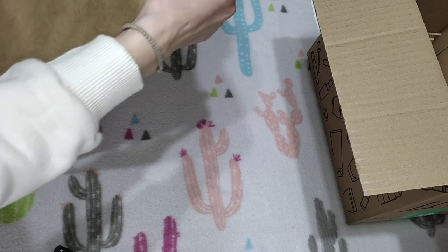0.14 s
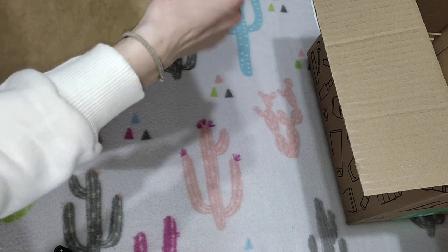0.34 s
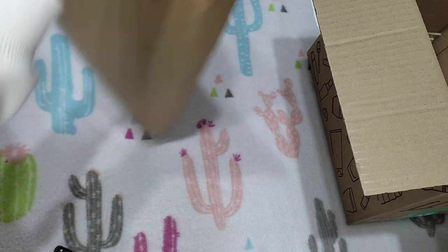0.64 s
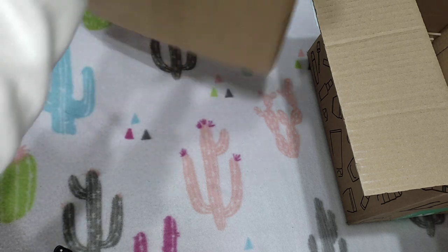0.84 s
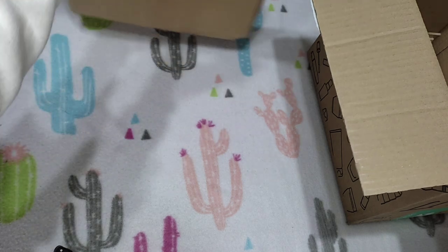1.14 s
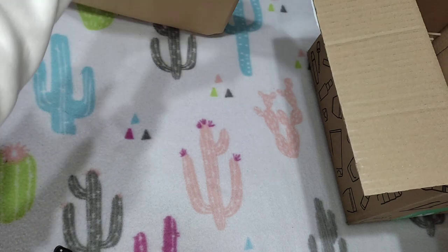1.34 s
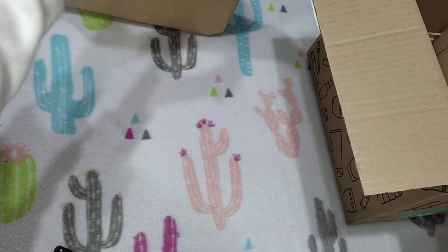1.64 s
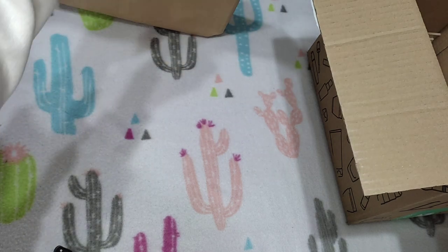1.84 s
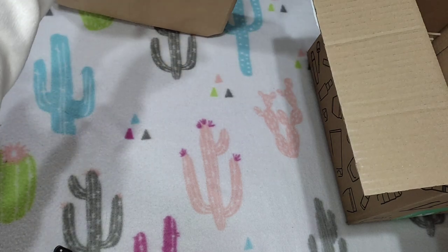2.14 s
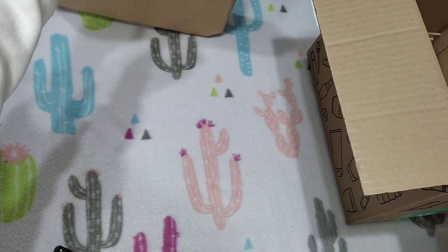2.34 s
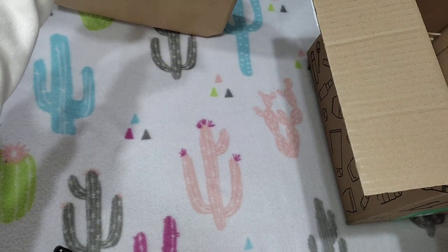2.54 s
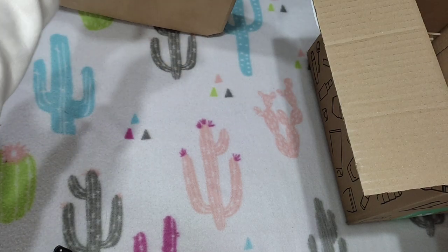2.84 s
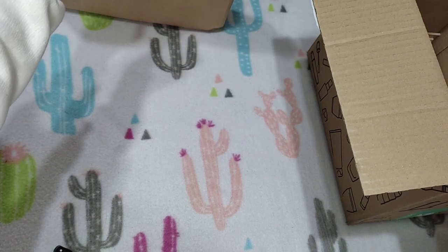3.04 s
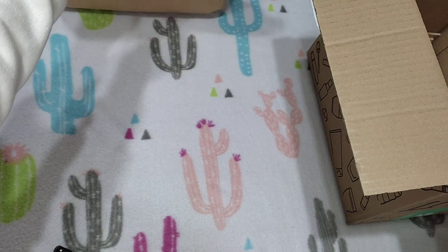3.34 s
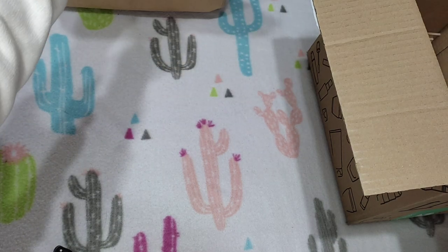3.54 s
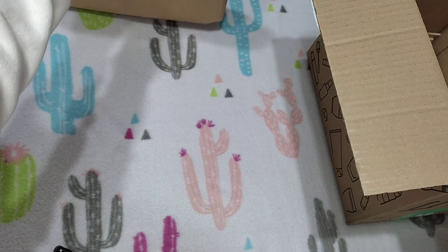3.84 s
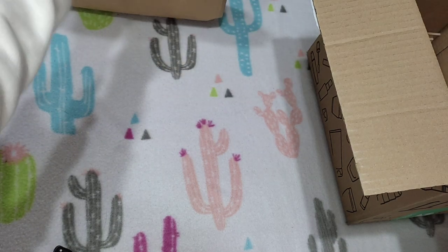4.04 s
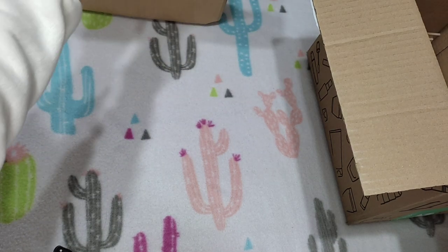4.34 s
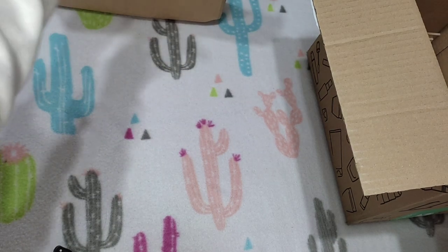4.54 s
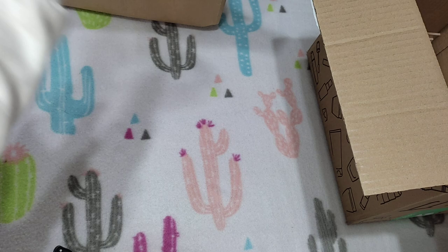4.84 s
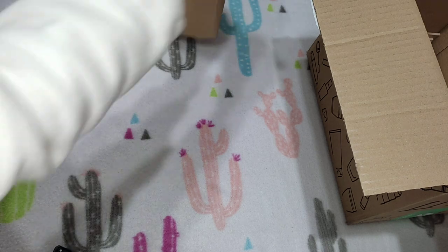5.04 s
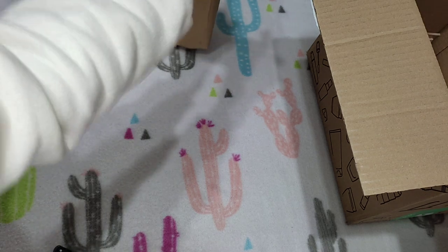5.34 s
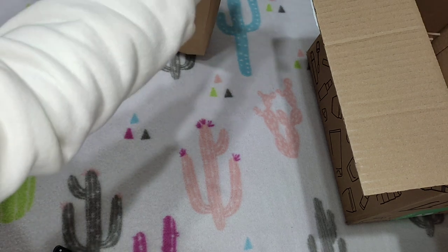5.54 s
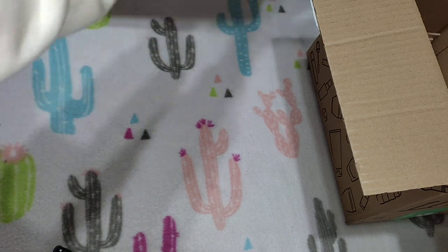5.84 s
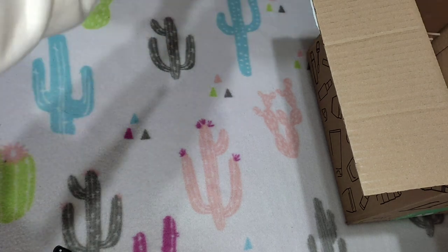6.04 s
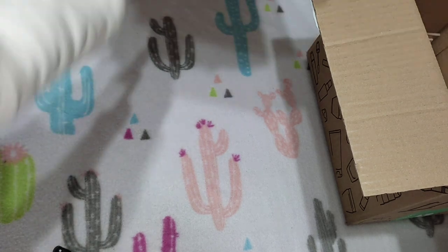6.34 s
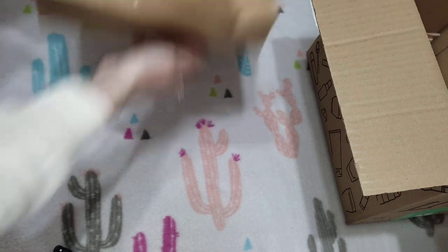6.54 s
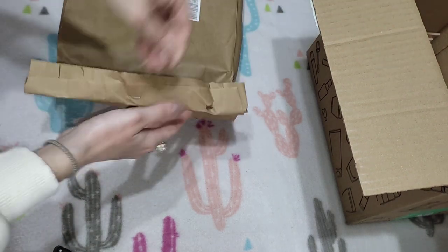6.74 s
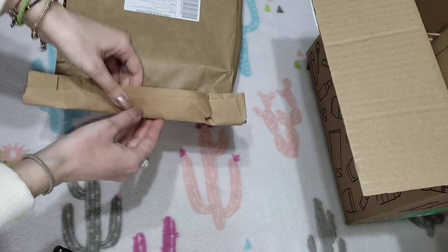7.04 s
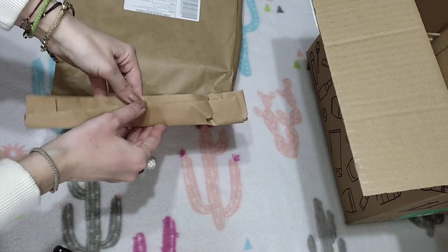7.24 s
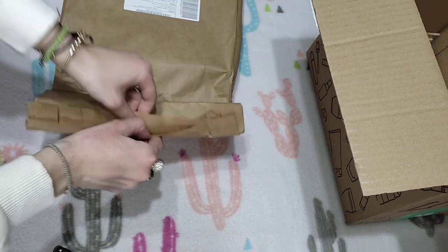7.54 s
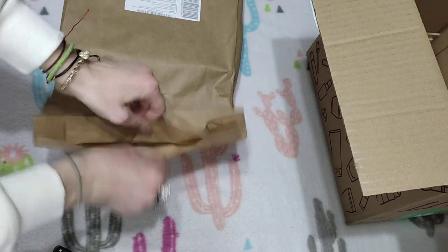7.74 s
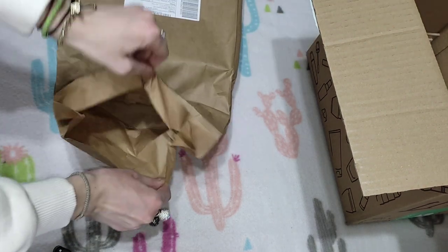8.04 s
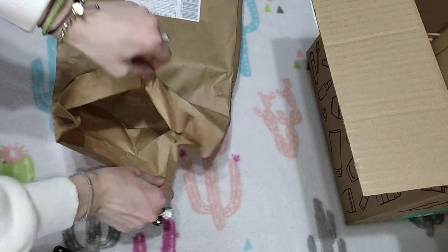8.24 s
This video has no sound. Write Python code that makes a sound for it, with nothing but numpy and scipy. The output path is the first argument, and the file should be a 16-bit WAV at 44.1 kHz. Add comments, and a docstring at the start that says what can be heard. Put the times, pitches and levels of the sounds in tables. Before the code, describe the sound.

A stiff paper envelope is handled close to the microphone in a small room, starting with a strong, crisp rustle in the first quarter second. Short, irregular strokes of crumpling and tearing follow, full of fine crackle and the sharp snaps of buckling creases. The crinkling thickens from about 1.5 to 2.1 seconds and carries on in uneven clumps, with an occasional soft thud from the whole envelope. A loud snap and rip come at about 4.2 seconds, and brighter tearing between 5.2 and 5.5 seconds. More rustling and a few dull bumps continue until about 6.8 seconds, when the paper drops to light ticks. From about 7.7 seconds to the end at just over 8 seconds, it crackles strongly again, sounding slightly hollow as the envelope opens. The room adds a short reverberation, and a faint steady hiss lies underneath.

```python
"""In a small room, a stiff kraft-paper envelope is handled, torn and crumpled near a two-port microphone.
Stick-slip friction makes the paper rustle, the sheet flap and the fibres crackle in clumps.
Creases snap by buckling and excite the resonances of the enclosed air; now and then the whole envelope
thuds. The room adds a short reverberation, and a steady hush with microphone hiss lies beneath.
The left port hears the paper first and rings in the top octave."""
import sys
import numpy as np
from scipy import signal
from scipy.fft import rfft, irfft, next_fast_len
from scipy.io import wavfile
from scipy.ndimage import uniform_filter1d, map_coordinates

SR = 44100
rng = np.random.default_rng(int(sys.argv[2]) if len(sys.argv) > 2 else 0)


def generate_wav(sig):
    """Save sig (samples, or channels by samples) to the path in sys.argv[1] as 16-bit PCM at SR."""
    pcm = np.round(np.clip(np.atleast_2d(sig).T, -1, 1) * 32767).astype(np.int16)
    wavfile.write(sys.argv[1], SR, pcm)


N = 370440


def amp(db):
    return 10 ** (np.asarray(db) / 20)


def unit_rms(x):
    return x / np.sqrt(np.mean(x ** 2) + 1e-20)


def along(points, hz):
    """Interpolation of (Hz, value) points on a logarithmic frequency axis."""
    freqs, values = np.transpose(points)
    return np.interp(np.log(hz + 1), np.log(freqs + 1), values)


def wobble(rate):
    """Spline interpolation through random knots, rate of them a second."""
    return map_coordinates(rng.standard_normal(int(N * rate / SR) + 4), [np.arange(N) * rate / SR])


def filtered(x, response):
    """Linear filtering: the spectrum of x is multiplied by a complex frequency response."""
    size = next_fast_len(N + SR // 2)
    return irfft(rfft(x, size) * response(np.fft.rfftfreq(size, 1 / SR)), size)[..., :N]


def minimum_phase(spectrum):
    """Folding the cepstrum gives a causal response of unit power with this spectral shape."""
    def response(hz):
        cepstrum = irfft(np.log(np.maximum(amp(along(spectrum, hz)), 1e-6)))
        half = len(cepstrum) // 2
        cepstrum[1:half] *= 2
        cepstrum[half + 1:] = 0
        gain = np.exp(rfft(cepstrum))
        return gain / np.sqrt(np.mean(np.abs(gain) ** 2))
    return response


def fading(power, t60):
    """Exponential decay spreads each impulse of power in time and conserves its energy."""
    keep = amp(-120 / (t60 * SR))
    return signal.lfilter([1 - keep], [1, -keep], power)


# Steady background hush, with the microphone's hiss peak near 12 kHz.
# Each row: frequency in Hz, relative spectral density in dB.
HUSH_SPECTRUM = [(25, -44), (60, -13.5), (250, -10.5), (3000, -19), (11000, -28.5), (11900, -17),
                 (15300, -32), (16500, -66)]

def background_hush():
    """Stationary Gaussian noise gives a steady hush, coloured at the top by the microphone."""
    return amp(-50.5) * filtered(rng.standard_normal((2, N)), minimum_phase(HUSH_SPECTRUM))


# Strokes of the hands on the paper. Each row: start in seconds, length in seconds, rustle level in dB,
# swell over the stroke in dB, fibre level relative to the rustle in dB.
HAND_STROKES = [(0, 0.11, -48.5, 17, -8), (0.152, 0.081, -22.5, -1, -6.5), (0.357, 0.015, -29.5, -4, -5.5),
                (0.442, 0.053, -31.5, 5.5, -10), (0.573, 0.21, -36.5, -0.5, -6.5),
                (0.952, 0.045, -44, 10, -8), (1.063, 0.073, -32, 3, 2), (1.182, 0.08, -37.5, 2, -9),
                (1.334, 0.043, -34.5, -5, -5), (1.547, 0.21, -28, -1.5, -7), (1.84, 0.18, -37, 8.5, -6),
                (2.152, 0.062, -30.5, -18, -7.5), (2.285, 0.24, -44, 3.5, -14),
                (2.575, 0.21, -32.5, -6, -3.5), (2.903, 0.093, -37, 10, -14), (3.043, 0.026, -31.5, 1, -6),
                (3.146, 0.065, -29.5, -6.5, -9.5), (3.361, 0.063, -31.5, -0.5, -3.5),
                (3.54, 0.034, -36, -5, -23), (3.605, 0.08, -39, 11.5, -5.5), (3.874, 0.16, -37.5, -13, -11),
                (4.178, 0.14, -25, 1.5, -5), (4.4, 0.038, -32, -18, -27), (4.488, 0.041, -34, 7, -3.5),
                (4.67, 0.15, -36, -1, -6), (4.89, 0.15, -32, -6.5, -6), (5.185, 0.045, -24, 4, -8),
                (5.351, 0.12, -25.5, 2, 1.5), (5.52, 0.16, -33.5, -3.5, -5.5),
                (5.765, 0.34, -31, 0.5, -5.5), (6.218, 0.12, -33, -9.5, -4), (6.402, 0.032, -24.5, 3, -5),
                (6.536, 0.17, -31.5, 9.5, -4), (6.739, 0.041, -25.5, 6.5, -3.5), (6.88, 0.12, -50, 2, -21),
                (7.209, 0.058, -38, 1, -7.5), (7.497, 0.15, -44, 9, 0), (7.747, .11, -38, 15.5, -8.5),
                (7.864, 0.089, -32.5, 10.5, -4.5), (8.131, 0.092, -22.5, -8, -3)]
# Freedom of the sheet in the grip. Each row: time in seconds, flap level in dB at a rustle of -28 dB.
GRIP_FREEDOM = [(0, -32.5), (.8, -37.5), (1.2, -39.5), (2.0, -35.5), (2.3, -40), (4.0, -39), (5.0, -34.5),
                (5.4, -40), (6.0, -37.5), (7.0, -37), (7.5, -49), (8.4, -38.5)]

def strokes():
    """Frictional drive of panels, flap and fibres in dB; overlapping strokes add in power."""
    rise_db_per_s, fall_db_per_s = 309, 272
    t, sample_t = np.arange(0, N + 64, 64) / SR, np.arange(N) / SR
    start, length, db, swell_db, fibre_db = np.transpose(HAND_STROKES)[..., None]
    held = db + swell_db * np.clip((t - start) / length, 0, 1)
    away = rise_db_per_s * np.maximum(start - t, 0) + fall_db_per_s * np.maximum(t - start - length, 0)

    def power_sum(each_db):
        return np.interp(sample_t, t, 10 * np.log10(np.sum(amp(each_db) ** 2, 0)))
    panel_db = power_sum(held - away)
    grip_db = np.interp(sample_t, *np.transpose(GRIP_FREEDOM))
    flap_db = grip_db + 0.74 * (panel_db + 28)  # the flap varies less than the rustle
    return panel_db, flap_db, power_sum(held + fibre_db - away)


def crackle(rate, spread_db, t60, clump_db):
    """Shot noise: tiny breaks of power-law size cluster into a power envelope of mean near 1."""
    when, size = rng.random((int(rate * N / SR), 2)).T
    breaks = np.bincount((when * N).astype(int), amp(-2 * spread_db * np.log(1.003 - size)), N)
    power = fading(fading(breaks, t60), t60 / 4) * amp(2 * clump_db * wobble(40))
    return power / (np.abs(uniform_filter1d(power, SR // 14)) + .01 * power.mean())


def ticks(rate, spread_db):
    """Isolated fractures radiate impulses of random sign and power-law size."""
    when, size, sign = rng.random((int(rate * N / SR), 3)).T
    heights = np.sign(sign - .5) * amp(-spread_db * np.log(1.003 - size))
    return np.bincount((when * N).astype(int), heights, N)


def shifting_noise(depth_db):
    """Spectral modulation: two noises change colour in patches, as panels between creases change size."""
    spectra = signal.stft(rng.standard_normal((2, N)), nperseg=1024)[2]
    patches = uniform_filter1d(rng.standard_normal(spectra.shape[1:]), 5, axis=0)
    patches = unit_rms(uniform_filter1d(patches, 2, axis=1))
    return unit_rms(signal.istft(spectra * amp(depth_db * patches), nperseg=1024)[1][:, :N])


# The flat panels between creases, then the whole flapping sheet.
# Each row: frequency in Hz, relative spectral density in dB.
PANEL_SPECTRUM = [(200, -26), (500, -9), (860, -9.5), (1380, -6.5), (3700, -9.5), (5000, -16.5),
                  (7500, -72)]
FLAP_SPECTRUM = [(25, -54), (60, -20), (140, -1), (310, 2), (500, -2), (900, -46)]
# Bright fibre crackle, with the same columns; the last points only limit the band near 15.5 kHz.
FIBRE_SPECTRUM = [(2500, -12.5), (4500, 2), (6550, 1), (11100, -8), (11900, 2.5), (15300, -14.5),
                  (15900, -50), (16300, -67)]
# Reverberation times of the room in seconds, for the panel, flap and fibre bands in turn.
REVERB_T60 = np.array([.22, .28, .16])

def paper():
    """Source and filter: friction and snaps drive three noise bands and the cavity (mid and side)."""
    panel_db, flap_db, fibre_db = strokes()
    levels = amp([panel_db, flap_db, fibre_db])
    common = crackle(rate=150, spread_db=4, t60=0.051, clump_db=9.5)
    grains = [crackle(rate=300, spread_db=5, t60=0.015, clump_db=3),
              crackle(rate=27, spread_db=6, t60=0.0075, clump_db=9.5),
              crackle(rate=250, spread_db=5.2, t60=0.01, clump_db=3)]
    # Harder, brighter strokes slide and rip densely; light ones only crackle.
    slide = 0.23 * amp(1.6 * (panel_db + 23.5) + 1.36 * (fibre_db - panel_db + 3.5))
    rasp = crackle(rate=2300, spread_db=2, t60=0.0036, clump_db=-3)  # paper dragged over paper
    crunches, out, knocks, cracks = snaps()

    opens_s, open_db, tick_db = 6.1, 7.5, 10
    mouth = amp(open_db) * (np.arange(N) > opens_s * SR)  # once open, the cavity rings with the rustle
    inside = mouth * levels[0] * np.sqrt(np.abs(grains[0])) * rng.standard_normal(N)
    out[0] += filtered(knocks + inside, cavity)

    tick_gain = amp(tick_db) / (1 + 3 * slide)  # sliding paper ticks more softly
    panel_ticks = ticks(rate=90, spread_db=4)
    fibre_ticks = panel_ticks + ticks(rate=60, spread_db=3.5)
    out[0] += filtered(tick_gain * levels[0] * panel_ticks, minimum_phase(PANEL_SPECTRUM))
    out[0] += filtered(cracks + tick_gain * levels[2] * fibre_ticks, minimum_phase(FIBRE_SPECTRUM))

    spectra = PANEL_SPECTRUM, FLAP_SPECTRUM, FIBRE_SPECTRUM
    for level, grain, crunch, spectrum, t60 in zip(levels, grains, crunches, spectra, REVERB_T60):
        texture = (0.46 * common + 0.43 * grain) ** (1 / (1 + 4.6 * slide))  # sliding evens the clumps
        direct = level ** 2 * (texture + slide * rasp) + crunch
        power = direct + amp(-5.5) * fading(direct, t60)  # the room answers diffusely
        out += filtered(np.sqrt(np.abs(power)) * shifting_noise(depth_db=3.5), minimum_phase(spectrum))
    return out


# Creases that snap. Each row: start in seconds, relative pop level in dB, pop pitch in Hz,
# relative fibre level in dB, time in seconds for the panel to decay by 60 dB.
CREASE_SNAPS = [(0.094, -23, 4260, -24.5, 0.025), (0.133, -16.5, 1220, -21, 0.022),
                (0.157, -11.5, 2030, -13.5, 0.042), (0.244, -19, 1930, -12.5, 0.046),
                (0.34, -20, 4020, -26, 0.059), (0.367, -26, 2980, -19, 0.023),
                (0.451, -18.5, 1460, -27, 0.022), (0.593, -20.5, 1920, -30.5, 0.054),
                (0.646, -28, 2500, -25, 0.027), (0.694, -30, 1490, -23, 0.025),
                (0.728, -19.5, 1550, -18, 0.031), (0.777, -16, 2260, -18, 0.042),
                (0.838, -18.5, 2450, -29, 0.035), (0.933, -24, 1790, -27, 0.02),
                (1.187, -15.5, 2450, -11, 0.035), (1.233, -16.5, 3660, -17.5, 0.068),
                (1.352, -17.5, 620, -25.5, 0.041), (1.442, -28, 4500, -29, 0.015),
                (1.46, -25.5, 885, -49, 0.03), (1.52, -15, 1120, -14.5, 0.038),
                (1.618, -16, 656, -16, 0.09), (1.72, -17, 1500, -18, 0.016),
                (1.824, -13.5, 1640, -18.5, 0.046), (1.899, -16.5, 1410, -16, 0.048),
                (1.938, -17, 2430, -20.5, 0.1), (1.991, -12, 1460, -20, 0.039),
                (2.008, -11, 1630, -12, 0.044), (2.051, -20.5, 1370, -21, 0.026),
                (2.093, -12, 1980, -11.5, 0.0068), (2.12, -24, 4570, -12.5, 0.014),
                (2.212, -24, 563, -39, 0.028), (2.239, -21, 2500, -15.5, 0.02),
                (2.243, -15.5, 2550, -15, 0.0083), (2.276, -14.5, 3370, -29, 0.014),
                (2.336, -21, 4000, -30, 0.018), (2.34, -21, 1200, -41, 0.022),
                (2.419, -25.5, 2520, -37, 0.056), (2.605, -16.5, 3960, -12, 0.01),
                (2.634, -23, 4000, -19, 0.018), (2.665, -21, 1340, -25, 0.031),
                (2.863, -19, 1250, -53, 0.0097), (2.909, -20, 1860, -31, 0.032),
                (2.921, -16.5, 1290, -41, 0.028), (2.974, -13.5, 1950, -21, 0.046),
                (2.99, -24, 4640, -15, 0.016), (3.025, -13, 2060, -12.5, 0.01),
                (3.038, -18, 1300, -20, 0.025), (3.136, -12.5, 2220, -12.5, 0.013),
                (3.148, -14, 1600, -14.5, 0.035), (3.359, -18.5, 3300, -21, 0.027),
                (3.405, -8.5, 2090, -12.5, 0.0043), (3.508, -24, 574, -24.5, 0.028),
                (3.582, -21, 1050, -51, 0.029), (3.637, -19.5, 640, -43, 0.0074),
                (3.663, -14, 3700, -10, 0.016), (3.748, -19, 1650, -24, 0.16),
                (3.805, -19.5, 1770, -20, 0.0085), (3.957, -17.5, 2720, -33, 0.021),
                (3.987, -21, 580, -41, 0.008), (4.149, -23, 711, -19, 0.046), (4.168, -17, 600, -13, 0.061),
                (4.187, -5.5, 3500, -17, 0.0064), (4.196, -6.5, 5000, -5, 0.0077),
                (4.439, -16, 2000, -28, 0.015), (4.466, -12, 2080, -9, 0.017),
                (4.501, -16.5, 1600, -17.5, 0.034), (4.539, -15, 870, -22, 0.021),
                (4.921, -14, 4120, -18, 0.01), (4.998, -20.5, 2390, -13.5, 0.0096),
                (5.082, -18, 616, -16.5, 0.11), (5.196, -19, 1250, -16.5, 0.074),
                (5.228, -24, 2000, -13.5, 0.13), (5.29, -22, 3060, -14, 0.041),
                (5.332, -8.5, 2570, -9, 0.005), (5.455, -13, 2780, -7, 0.038),
                (5.602, -24.5, 606, -27, 0.025), (5.693, -18.5, 2430, -21, 0.034),
                (5.744, -32, 4500, -12.5, 0.014), (5.879, -23, 3000, -17, 0.019),
                (5.968, -20, 1890, -27, 0.092), (6.064, -20, 902, -28, 0.033),
                (6.238, -20, 4190, -16.5, 0.015), (6.278, -16.5, 1750, -18, 0.044),
                (6.414, -9.5, 2720, -13.5, 0.029), (6.426, -16, 510, -19.5, 0.059),
                (6.543, -17, 3000, -24, 0.015), (6.608, -15, 2170, -24, 0.017),
                (6.624, -15, 2200, -15.5, 0.034), (6.694, -23, 454, -17, 0.058),
                (7.325, -21.5, 1360, -24, 0.021), (7.498, -22, 1260, -35, 0.025),
                (7.645, -20, 2110, -20, 0.016), (7.732, -15, 4380, -17.5, 0.012),
                (7.757, -27, 407, -13.5, 0.011), (7.845, -34, 800, -13, 0.011),
                (7.864, -22, 3000, -9.5, 0.042), (7.892, -19, 1210, -12, 0.018),
                (7.934, -19, 1300, -17, 0.0072), (7.953, -19, 1320, -16, 0.052),
                (8.028, -17.5, 3470, -17.5, 0.027), (8.074, -11.5, 970, -14, 0.014),
                (8.085, -18, 483, -14.5, 0.062), (8.099, -10, 1160, -11, 0.0093),
                (8.127, -21, 1210, -17, 0.018), (8.192, -13, 1350, -14.5, 0.034),
                (8.251, -15.5, 1420, -36, 0.034), (8.288, -31, 2000, -20.5, 0.02)]

def snaps():
    """Snap-through buckling gives a crunch (power per band), a resonant pop, a knock and cracks."""
    kick, knock_db, crack_db = 11, 21, 9
    t = np.arange(SR // 8) / SR
    crunches, pops = np.zeros((3, N + SR)), np.zeros((2, N + SR))
    knocks, cracks = np.zeros((2, N + SR))
    reverb = amp(-7.5 - 60 * t / REVERB_T60[0])
    for start, pop_db, pop_hz, fibre_db, t60 in CREASE_SNAPS:
        at = slice(round(start * SR), round(start * SR) + len(t))
        life = max(t60, .006) * np.array([[1], [2], [.65]])  # the sheet lasts longest, fibres least
        shape = amp(-60 * t / life) * (1 - np.exp(-t / (0.0062 * life)))  # longer crunches start softer
        crunches[:, at] += (amp([[pop_db - 2], [pop_db - 16.5], [fibre_db - 1.5]]) * shape) ** 2
        push = rng.standard_normal((2, len(t)))
        direct = shape[0] * push * [[1], [.4]]  # the direct sound is mostly mid
        direct[0, 0] += kick  # the first instant of the buckle
        resonator = signal.iirpeak(pop_hz, Q=2 * (pop_hz / 1000) ** 0.5, fs=SR)
        ring = signal.lfilter(*resonator, direct + reverb * push[::-1])
        pops[:, at] += amp(pop_db + 6) * ring / np.abs(ring).max()
        panel_size = 1000 / (pop_hz + 1000)  # big, low panels knock hardest
        knocks[at] += amp(pop_db + knock_db) * panel_size * amp(-60 * t / 0.0054) * push[1] / 2
        delays = (rng.random(3) * [0, .2, .5] * life[2] * SR).astype(int)
        cracks[at.start + delays] += amp(fibre_db + crack_db) * rng.choice([-1, 1], size=3)
    return crunches[:, :N], pops[:, :N], knocks[:N], cracks[:N]


# Modes of the air inside the envelope. Each row: frequency in Hz, bandwidth in Hz, gain in dB.
CAVITY_MODES = [(410, 140, 4), (780, 160, -4), (1270, 240, 0)]

def cavity(hz):
    """Modal superposition: the enclosed air responds as damped resonators of alternating sign."""
    return sum((-1) ** k * amp(db) * 1j * hz * width / (centre ** 2 - hz ** 2 + 1j * hz * width)
               for k, (centre, width, db) in enumerate(CAVITY_MODES))


# The whole envelope buckles or is shoved. Each row: start in seconds, strength in dB, nominal pitch in Hz.
BODY_THUMPS = [(1.181, -17, 123), (1.232, -9.5, 322), (1.717, -10, 386), (2.001, -11.5, 199),
               (2.664, -11, 294), (3.773, -7.5, 305), (4.535, -11.5, 300), (4.896, -6.5, 480),
               (5.189, -18.5, 120), (6.033, -15.5, 148), (6.42, -11, 120), (6.693, -12, 221),
               (6.774, -15, 236), (8.099, -15, 347)]

def thumps():
    """Heavily damped oscillation: the envelope thuds for a cycle or two, sagging in pitch (mid only)."""
    out, t = np.zeros((2, N + SR)), np.arange(SR // 5) / SR
    for start, db, hz in BODY_THUMPS:
        cycles = hz * t
        shape = amp(db - 9.4 * cycles) * (1 - np.exp(-cycles / 0.56))
        out[0, round(start * SR):][:len(t)] += shape * np.sin(2 * np.pi * 1.17 * cycles ** 0.863)
    return out[:, :N]


# Likeness of the sound at the two ports. Each row: frequency in Hz, coherence from 0 to 1.
COHERENCE = [(60, 0.59), (200, 0.92), (600, 0.76), (1500, 0.2), (4000, 0.097), (12000, 0.0061)]

def scene():
    """Spatial coherence: mid and side are weighted so that left and right are most alike in the bass."""
    def weights(hz):
        angle = np.arccos(np.clip(along(COHERENCE, hz), 0, 1)) / 2
        return np.array([np.cos(angle), np.sin(angle)])
    mid, side = filtered(paper() + thumps() + background_hush(), weights)
    return np.array([mid + side, mid - side])


# Colour of the microphone ports. Each row: frequency in Hz, left level minus right level in dB.
PORT_BALANCE = [(60, 1.5), (200, 0), (380, 2.5), (700, 2.5), (1290, -1.5), (2380, 0.5), (4400, -2.5),
                (8120, -7), (15000, 19.5)]

def record(dry):
    """Level and time differences separate the ports; peaks saturate and the band is limited."""
    left_lead_s, ceiling, bass_cut_hz, top_hz = 0.00013, .92, 40, 16640
    share = np.array([[.5], [-.5]])

    def ports(hz):
        return amp(share * along(PORT_BALANCE, hz)) * np.exp(2j * np.pi * hz * share * left_lead_s)
    heard = filtered(dry, ports)
    saturated = heard / (1 + np.abs(heard / ceiling) ** 8) ** (1 / 8)
    return filtered(saturated, lambda hz: (hz < top_hz) / (1 + (bass_cut_hz / (hz + 1)) ** 2))


dry = scene()
out = record(dry)
generate_wav(out)
```